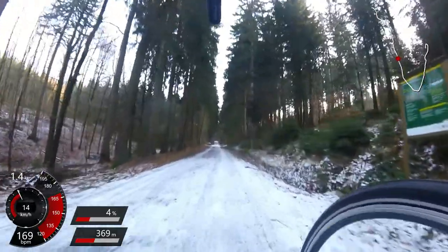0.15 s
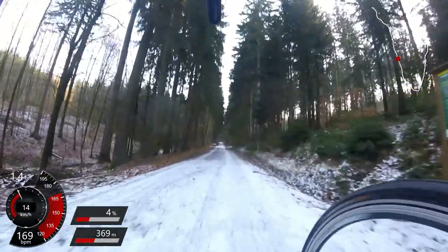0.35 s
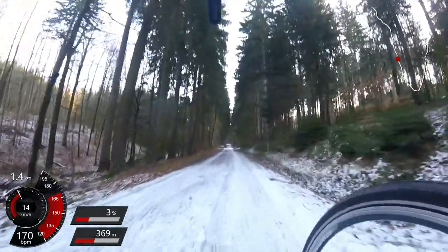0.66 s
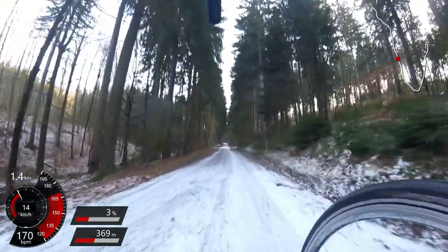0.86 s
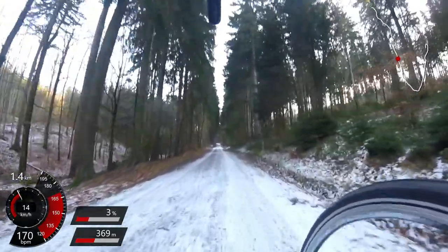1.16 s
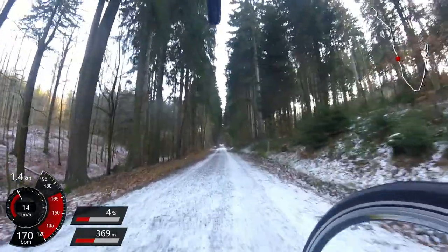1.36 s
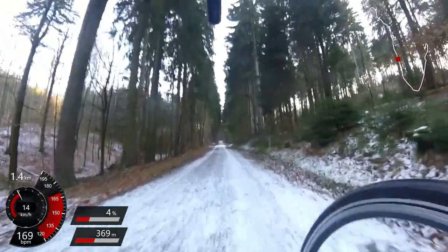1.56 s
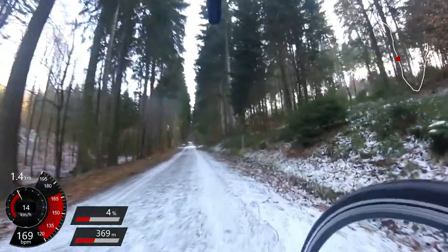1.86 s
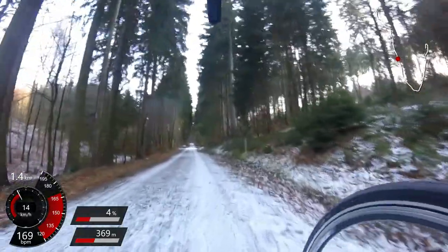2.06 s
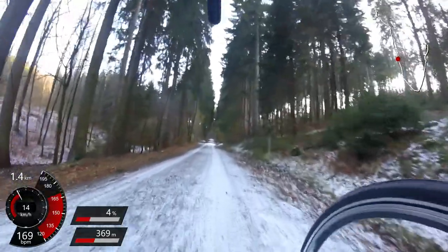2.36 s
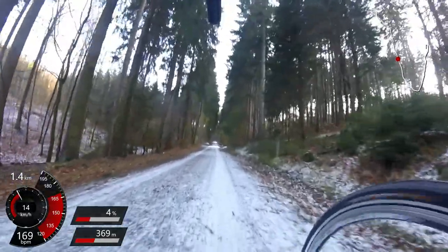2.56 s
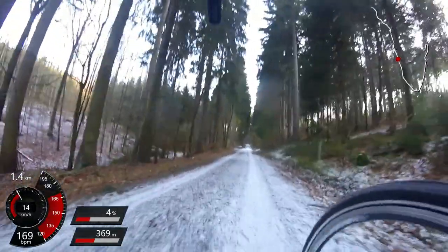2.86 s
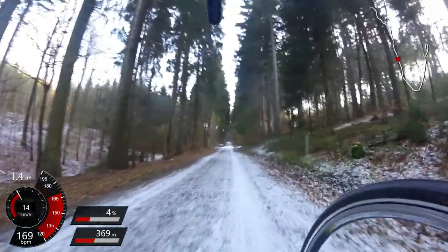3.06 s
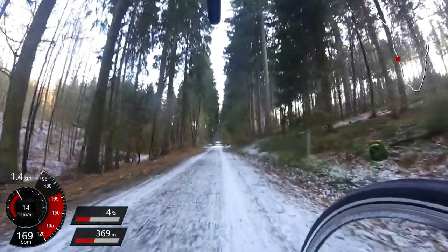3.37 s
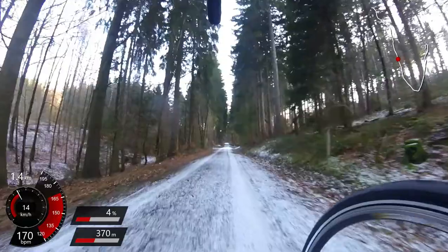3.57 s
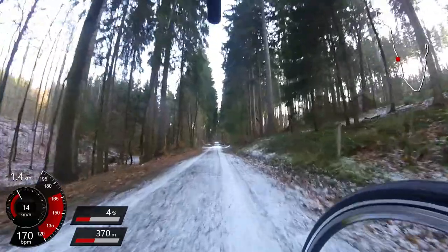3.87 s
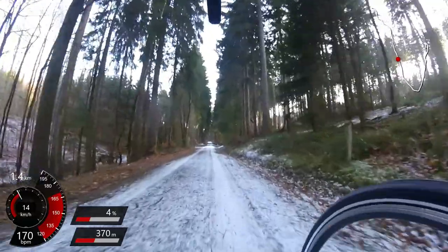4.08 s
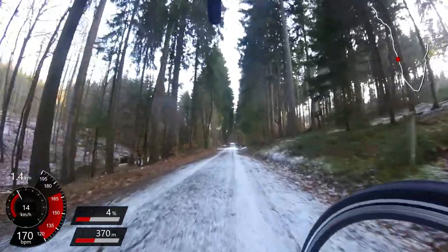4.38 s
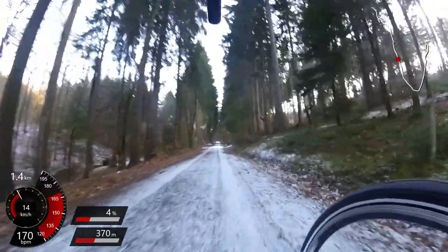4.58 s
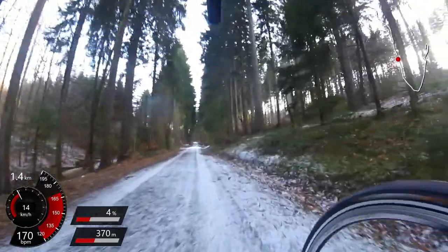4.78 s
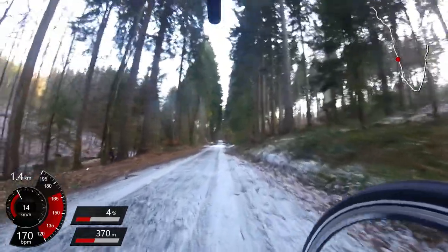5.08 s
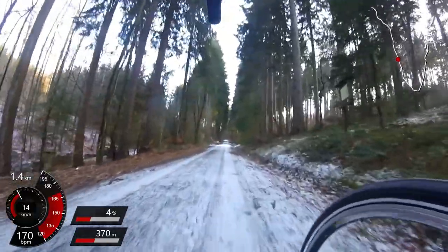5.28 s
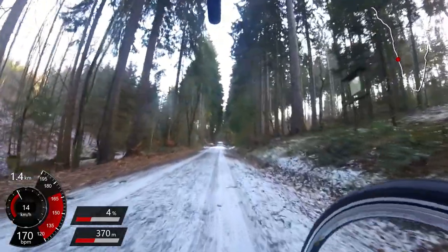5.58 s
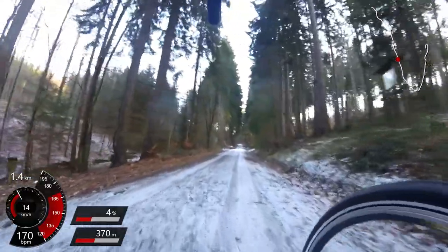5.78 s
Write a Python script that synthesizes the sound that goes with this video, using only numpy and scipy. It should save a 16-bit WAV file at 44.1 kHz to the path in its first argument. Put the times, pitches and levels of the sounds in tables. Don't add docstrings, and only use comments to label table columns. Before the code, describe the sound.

Close mono sound from inside a closed case on a bike frame: the tyre bounces with heavy, wobbling bass, and fork and stays shudder above it. Beneath lies a faint grainy snow crackle, harder and brighter before one second, then softer. Small ice lumps knock the tubes dully, crust ticks sharply, and the clamp slips once clearly and later weakly. The throb thins around three and a half seconds, then returns unevenly. No echo.

```python
import sys
import numpy as np
from scipy import signal
from scipy.io import wavfile
from scipy.ndimage import uniform_filter1d, minimum_filter1d

SR = 44100
rng = np.random.default_rng(int(sys.argv[2]) if len(sys.argv) > 2 else 0)


def master(y):
    cut = np.clip(np.atleast_2d(y).T, -1, 1)
    pcm = np.round(cut * 32767)
    wavfile.write(sys.argv[1], SR, pcm.astype(np.int16))


def invert_db(x):
    u = np.asarray(x, float) / 20
    return 10 ** u


N = 261513

# time in seconds, bounce level in dB, length in seconds, pitch in Hz.
RUTS = [(0.101, -13, 0.12, 53.27), (0.276, -17, 0.086, 54.64), (0.398, -15, 0.062, 52.47),
        (0.56, -13.5, 0.045, 49.9), (0.736, -13.5, 0.079, 57.17), (0.944, -14.5, 0.086, 47.68),
        (1.029, -13, 0.06, 53.43), (1.21, -17, 0.064, 51.98), (1.337, -16.5, 0.092, 50.8),
        (1.483, -12.5, 0.048, 51.83), (1.542, -13, 0.057, 48.77), (1.67, -9.5, 0.1, 51.6),
        (1.975, -14, 0.055, 47.75), (2.075, -16.0, 0.097, 47.84), (2.206, -13.5, 0.086, 54.23),
        (2.308, -14, 0.073, 45.43), (2.373, -10, 0.055, 46.2), (2.661, -13.5, 0.07, 47.13),
        (2.804, -11.5, 0.17, 49.09), (3.472, -20.5, 0.12, 50.95), (3.952, -11.5, 0.047, 50.84),
        (4.017, -12, 0.042, 54.57), (4.213, -14, 0.2, 52.5), (4.688, -12.5, 0.079, 50.82),
        (4.887, -15, 0.085, 57.5), (5.026, -17, 0.075, 47.53), (5.179, -14.5, 0.1, 49.58),
        (5.345, -11.5, 0.046, 48.95), (5.764, -16.5, 0.074, 53.54), (5.905, -16.5, 0.11, 51.6)]
# time in seconds, flex level in dB, length in seconds.
RIDGES = [(0.052, -23.5, 0.069), (0.323, -16, 0.038), (0.383, -19, 0.053), (0.489, -21.5, 0.072),
          (0.58, -13.5, 0.042), (0.784, -18, 0.16), (0.947, -20, 0.032), (1.18, -18.5, 0.099),
          (1.417, -22.5, 0.16), (1.533, -22.9, 0.058), (1.835, -21, 0.045), (2.0, -23, 0.071),
          (2.148, -26, 0.043), (2.372, -14.5, 0.048), (2.527, -23, 0.12), (2.725, -19, 0.051),
          (2.905, -28, 0.14), (3.06, -24.7, 0.044), (3.131, -26.5, 0.051), (3.887, -17.5, 0.061),
          (4.081, -22.3, 0.064), (4.157, -23, 0.049), (4.548, -21, 0.037), (4.767, -24, 0.08),
          (4.849, -22, 0.052), (5.111, -26, 0.068), (5.266, -16.5, 0.063), (5.592, -21, 0.095),
          (5.684, -18.5, 0.056), (5.865, -17, 0.034)]
# time in seconds, level in dB.
ROAD = [(0, -20.5), (1.3, -20.5), (1.6, -21), (1.85, -23.5), (2.55, -21), (2.95, -16.5), (3.05, -27),
        (3.12, -18), (3.25, -27.5), (3.36, -18), (3.62, -21), (3.8, -27), (4.1, -26.5), (4.44, -22),
        (4.52, -14.5), (4.8, -19.5), (5.47, -15.5), (5.6, -22.5)]
# frequency in Hz, density in dB per Hz.
SHAKE = [(20, -59), (30, -38), (45, -3.5), (70, -6), (100, -21), (130, -36.5), (250, -78.5), (1000, -110)]
# frequency in Hz, width in Hz, level in dB.
STAYS = [(118.2, 23.2, 0), (151.6, 20, -2.5), (199.3, 26.4, -7)]
# time in seconds, crust hardness in dB, loose powder in dB,
# weight on the pedals in dB.
CRUST = [(0, -56, 0, 1.5), (.5, -55, 1.5, -1), (.68, -47, -0.5, 1.5), (.88, -43.5, -2, -0.5),
         (1.1, -52, 0, 0), (1.3, -51.5, 0.5, -1.5), (1.64, -55, -1, -1), (1.68, -57.5, -.5, 0.5),
         (2.06, -50.5, 1, -2.5), (2.11, -54.5, -3, -2.5), (2.3, -54.5, 1, 1), (2.99, -62.5, 0, 0),
         (3.05, -55, 2, -3), (4.0, -54.5, 2, 0), (4.55, -53, 3, 0), (4.94, -52, 4, 0.5),
         (5.04, -59, 2.5, 2), (5.6, -53, 2.5, 0.5)]
# time in seconds, change in dB, length in seconds.
LUMPS = [(0.096, 3.5, .05), (0.772, -1, 0.012), (.86, 2, 0.064), (0.91, -5.5, 0.019), (1.014, -1, 0.076),
         (1.08, 2.5, .03), (1.105, -3.5, 0.015), (1.177, -1, 0.026), (1.236, 2.5, 0.086), (1.338, 3.5, .02),
         (1.68, -1, .04), (1.738, -9.5, 0.034), (2.335, -2.5, .03), (2.443, -3.5, 0.034), (2.5, 0, 0.044),
         (2.702, 4, .02), (2.726, -6, 0.018), (2.76, 1.5, .03), (3.389, 4, 0.025), (3.73, 1, 0.038),
         (3.78, 2.5, .02), (3.86, -6, 0.024), (3.872, 6, 0.015), (3.958, -4.5, 0.061), (4.156, 1.5, .04),
         (5.238, -1, 0.053), (5.824, -3.5, .05), (5.895, 3.5, .05)]
# frequency in Hz, density in dB per Hz.
CASE_WALL = [(700, -10.5), (1100, -2.5), (1600, -4.5), (3100, -5), (4300, -6.5), (4550, -6.5), (6000, -19),
             (8000, -33.5), (12000, -75.5)]
# frequency in Hz, density in dB per Hz.
LENS_SEAL = [(3500, -22.5), (4500, -25.5), (4750, -3.5), (5600, -1), (6150, -5.5), (7000, -5), (7700, -8),
             (8500, -16), (9300, -17.5), (10300, -27), (10900, -36), (12500, -36), (13300, -45.5),
             (14400, -64)]
# frequency in Hz, width in Hz, level in dB.
AIR_POCKETS = [(5094, 270, 2), (6510, 270, 1.5)]
# frequency in Hz, width in Hz, level in dB.
FRAME = [(297, 74, -4.5), (360, 26, 4), (403, 66, -1), (520, 160, -6), (622.5, 126, -3), (822.6, 98, -1.5),
         (943, 172, -6)]
# time in seconds, peak in dB, pitch in Hz,
# 60 dB decay in seconds.
KNOCKS = [(.085, -30, 280, 0.12), (.41, -49, 930, 0.037), (.75, -25.5, 360, 0.094), (2.2, -32, 655, 0.06),
          (2.556, -31, 564, 0.046), (2.572, -37, 770, 0.05), (2.574, -27, 982, 0.022),
          (2.573, -31, 520, 0.044), (.05, -29.5, 550, 0.069), (.96, -39, 360, 0.45),
          (3.69, -36.5, 370, 0.14), (5.15, -32, 585, 0.059)]
# time in seconds, strength in dB, share that rings the case in dB.
SNAPS = [(.0757, -36, -14), (.262, -30.5, -11), (.3287, -29.5, -4), (.379, -27, -19), (.4334, -38.5, 5),
         (.5356, -25, -10), (.5824, -22.5, -17), (.6145, -30, -17), (.6584, -20.5, -18), (.6759, -34, 3),
         (.6953, -32.5, 6), (.7522, -21, -20), (.7954, -22, -12), (.8177, -25, -13), (.862, -20.5, -10),
         (.8982, -25, -3), (1.1964, -40, 6), (2.5162, -38.5, 2), (1.4547, -29, -12), (1.487, -26, -18),
         (1.505, -25, -14), (1.6524, -42, 7), (2.0254, -30, -2.5), (2.0687, -25, -8), (2.607, -32, -20),
         (3.4431, -39, 6), (3.7783, -29, -7), (4.512, -37, 5), (4.9332, -34, -1), (5.6297, -39, 5)]
# frequency in Hz, density in dB per Hz.
CRACK = [(300, -6), (1200, 2.5), (3000, 6), (5000, -2), (9000, -32), (14000, -59.5)]
# frequency in Hz, density in dB per Hz.
SLIP = [(60, -7.5), (150, 5), (500, -4.5), (2000, -19.5), (8000, -31), (12000, -41.5), (15000, -72.5)]
# time in seconds, peak in dB.
JOLTS = [
    (1.4882, -18),
    (1.5063, -30),
    (2.7045, -31),
]

CRUST_MID_DB = -54


def evened(x):
    return x / np.sqrt(np.mean(x ** 2) + 1e-20)


def columns(rows):
    s, *values = np.transpose(rows)
    return [np.interp(np.arange(N) / SR, s, v) for v in values]


def swells(s, length_s):
    t = np.arange(0, N + 64, 64) / SR
    return np.exp(-np.log(16) * ((t - s[:, None]) / length_s[:, None]) ** 2)


def smooth(control):
    return np.interp(np.arange(N) / 64, np.arange(len(control)), control)


def causal(points, modes=(), size=8192):
    hz = abs(np.fft.fftfreq(size, 1 / SR))
    f, db = np.transpose(points)
    power = invert_db(np.interp(np.log(hz + 1), np.log(f), db)) ** 2
    for centre, width, peak_db in modes:
        power = power + invert_db(peak_db) ** 2 / (1 + (2 * (hz - centre) / width) ** 2) ** 2
    log_gain = np.log(power + 1e-12) / 2
    phase = -signal.hilbert(log_gain).imag
    response = np.fft.ifft(np.exp(log_gain + 1j * phase)).real
    return evened(response) / np.sqrt(size)


def through(x, response):
    return signal.oaconvolve(x, response)[:N]


def ringing(hz, width, steady):
    r = np.exp(-np.pi * width / SR)
    slow = rng.standard_normal(N) + 1j * rng.standard_normal(N)
    for _ in range(2):
        slow = signal.lfilter([1 - r], [1, -r], slow)
    slow = slow / (abs(slow) + .3 * np.std(slow)) ** np.clip(steady, 0, 1)
    turning = np.exp(2j * np.pi * np.cumsum(hz * np.ones(N)) / SR)
    return evened((slow * turning).real)


def flicker(span_s):
    size = max(int(span_s * SR), 2)
    once = uniform_filter1d(rng.standard_normal(N), size)
    return evened(uniform_filter1d(once, size))


def grains(per_s, spread_db):
    draw, size, sign = rng.random(N), rng.exponential(1, N), rng.standard_normal(N)
    return evened((draw < per_s / SR) * sign * invert_db(spread_db * np.minimum(size, 5)))


def shaken(rows, floor_db):
    s, db, length_s = np.transpose(rows)[:3]
    power = (invert_db(db)[:, None] * swells(s, length_s)) ** 2
    return 10 * np.log10(smooth(power.sum(0)) + invert_db(floor_db) ** 2), power


def crust():
    hard_db, powder_db, load_db = columns(CRUST)
    s, change_db, length_s = np.transpose(LUMPS)
    lumps_db = smooth(change_db @ swells(s, length_s))
    return hard_db - CRUST_MID_DB + lumps_db, powder_db, load_db


def rumble():
    road_db, = columns(ROAD)
    bounce_db, weight = shaken(RUTS, road_db - 0.5)
    fork_db, _ = shaken(RIDGES, road_db - 9)
    rest_hz = 49.91
    pull_hz = (np.transpose(RUTS)[3] - rest_hz) @ weight / (weight.sum(0) + invert_db(-44))
    bounce = invert_db(bounce_db - 1.5) * ringing(rest_hz + smooth(pull_hz), width=10.5, steady=1.0)
    fork = invert_db(fork_db - 2.5) * ringing(hz=80, width=19.1, steady=0.99)
    loose = through(rng.standard_normal(N), causal(SHAKE, size=16384))
    loose_db = .5 * (bounce_db + fork_db) - 0.2
    hard_db, _, load_db = crust()
    stays_db = -39.5 + 0.62 * (hard_db + 1.7 * load_db) + 0.13 * (fork_db + 28)
    bending = causal([(60, -36.5), (170, -17.5), (260, -28.5), (600, -77.5)], STAYS, size=16384)
    stays = through(rng.standard_normal(N), bending)
    return bounce + fork + invert_db(loose_db) * evened(loose) + invert_db(stays_db) * evened(stays)


def crunch():
    hard_db, powder_db, load_db = crust()
    hard_db = hard_db + .4 * flicker(span_s=.02)
    clumps_db = 1.6 * flicker(span_s=0.0023) + 0.88 * flicker(span_s=0.012)
    breaks = grains(per_s=2500, spread_db=2.0)
    air = invert_db(clumps_db) * (1.02 * breaks + 1.34 * rng.standard_normal(N))

    by_wall = through(air, causal(CASE_WALL))
    wall_db = CRUST_MID_DB + hard_db + 1.5

    flakes = grains(per_s=1200, spread_db=4.0)
    spray = 0.98 * air + 0.7 * flakes + 0.56 * rng.standard_normal(N)
    by_seal = through(spray, causal(LENS_SEAL, AIR_POCKETS))
    seal_db = -51 + 0.93 * hard_db + powder_db - 0.6

    drive = invert_db(0.77 * clumps_db) * (0.35 * breaks + 0.84 * rng.standard_normal(N))
    tubes = [(60, -17.5), (300, -3.5), (1100, -25.0), (1800, -51.5), (6000, -95.5)]  # (Hz, dB per Hz)
    by_tube = through(drive, causal(tubes, FRAME, size=16384))
    tube_db = -47.5 + 0.85 * hard_db + load_db + 0.86
    return invert_db(wall_db) * evened(by_wall) + invert_db(seal_db) * evened(by_seal) + invert_db(tube_db) * evened(by_tube)


def knocks():
    t, out = np.arange(SR // 5) / SR, np.zeros(N)
    for s, db, hz, t60 in KNOCKS:
        swell = 1 - np.exp(-t / 0.0047)
        tone = invert_db(db - 60 * t / t60) * swell * np.sin(2 * np.pi * hz * t)
        out[round(s * SR):][:len(t)] += tone
    return out


def snaps():
    s, crack_db, ring_db = np.transpose(SNAPS)
    at = np.minimum(np.round((s + 0.001164) * SR).astype(int), N - 1)
    grit = (rng.random(N) < 14 / SR) * invert_db(-42 + 1.3 * crust()[0])
    t = np.arange(400) / SR
    breaks = rng.standard_normal(len(t)) * (rng.random(len(t)) < .12)
    crumble = (t == 0) + invert_db(-14.5) * breaks * np.exp(-t / .003)
    crack = signal.convolve(causal(CRACK), crumble)
    ring = causal([(1000, -33.5), (5500, -8), (9000, -51.0), (14000, -81.0)], AIR_POCKETS)
    # level of the snaps in dB, level of the grit in dB, response
    parts = [(crack_db - 4.5, .1, crack),
             (crack_db + ring_db + 2.0, -3, ring),
             (-43 + 0 * s, -3.5, causal(SLIP))]
    out = np.zeros(N)
    for level_db, grit_db, shape in parts:
        spread_db = 2.5 * rng.standard_normal(N)
        train = grit * invert_db(grit_db + spread_db) * rng.choice([-1., 1.], N)
        train[at] = rng.choice([-1., 1.], len(s)) * invert_db(level_db)
        out += through(train, shape / abs(shape).max())
    return out


def jolts():
    s, db = np.transpose(JOLTS)
    train, shape = np.zeros(N), causal(SLIP)
    train[np.round(s * SR).astype(int)] = -invert_db(db)
    return through(train, shape / abs(shape).max())


def scene():
    mix = rumble() + crunch() + knocks() + snaps() + jolts()
    return mix[None]


def held_down(x):
    ceiling, span = .43, 1500
    room = np.minimum(ceiling / (abs(x) + 1e-9), 1)
    return x * uniform_filter1d(minimum_filter1d(room, span), span)


def starved(x, from_hz=8200, full_hz=11000, depth_db=9.5):
    hz, _, z = signal.stft(x, SR, nperseg=2048, noverlap=1024)
    band, hold = np.arange(len(hz)) // 8, np.arange(z.shape[-1]) // 2
    sag = rng.exponential(1, (hold.max() + 1, band.max() + 1))[hold].T[band] - .6
    reach = np.clip((hz - from_hz) / (full_hz - from_hz), 0, 1)[:, None]
    edge_hz = 12700 + 1600 * rng.random(hold.max() + 1)[hold]
    gain = invert_db(-depth_db * reach * sag) * (hz[:, None] < edge_hz)
    return signal.istft(z * gain, SR, nperseg=2048, noverlap=1024)[1][:, :N]


def roll_off(x):
    return signal.sosfilt(signal.butter(12, 14430, fs=SR, output="sos"), x)


def record(dry):
    mix = starved(held_down(dry))
    return roll_off(mix)


dry = scene()
out = record(dry)
master(out)
```